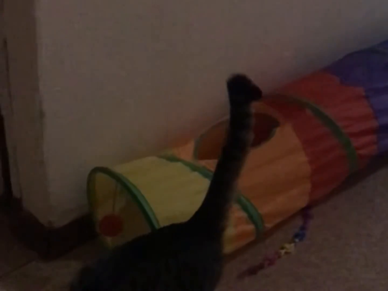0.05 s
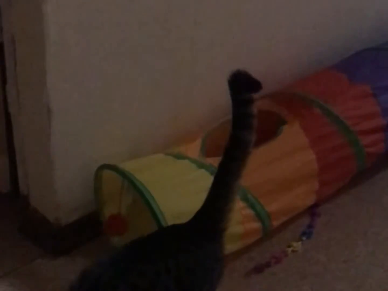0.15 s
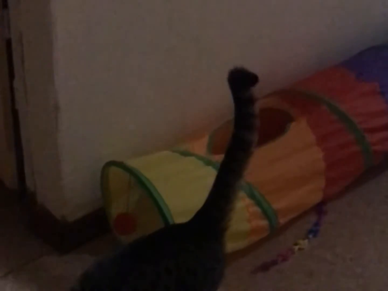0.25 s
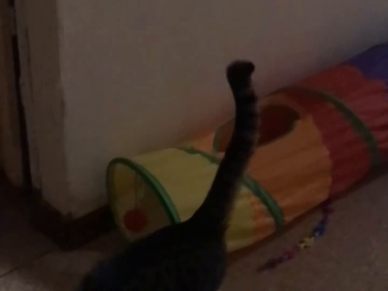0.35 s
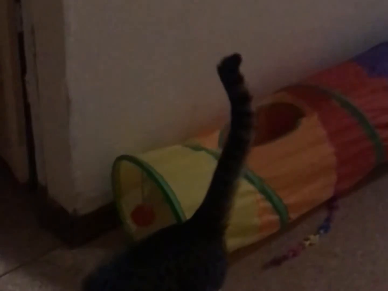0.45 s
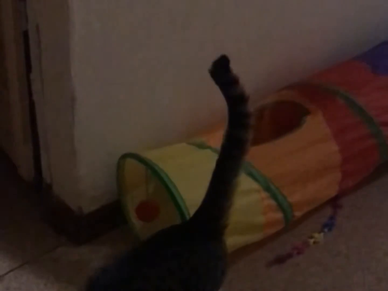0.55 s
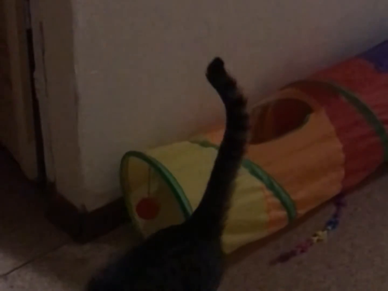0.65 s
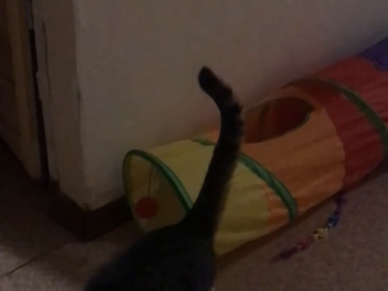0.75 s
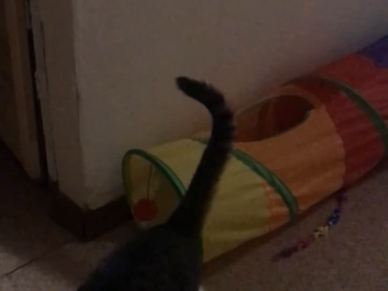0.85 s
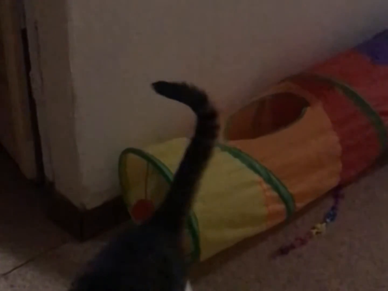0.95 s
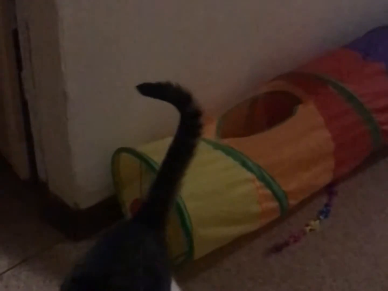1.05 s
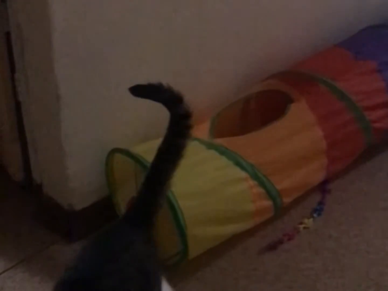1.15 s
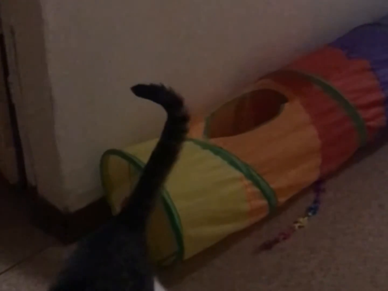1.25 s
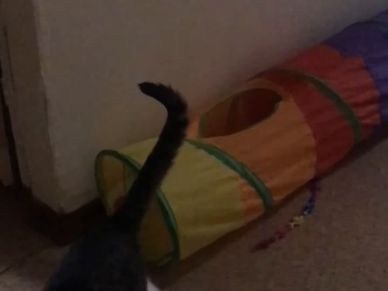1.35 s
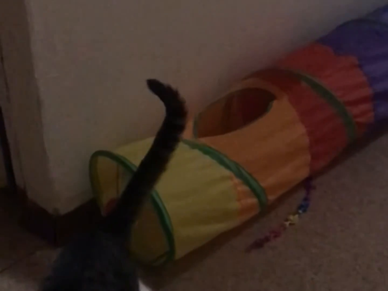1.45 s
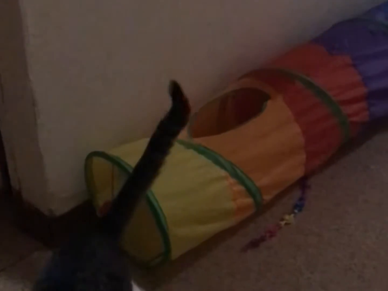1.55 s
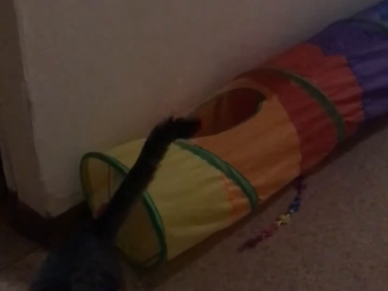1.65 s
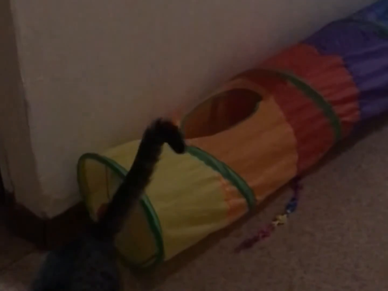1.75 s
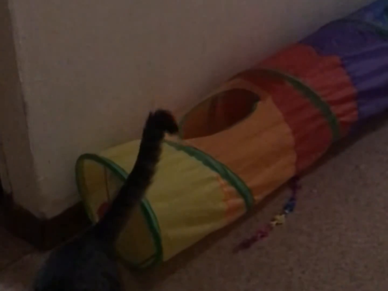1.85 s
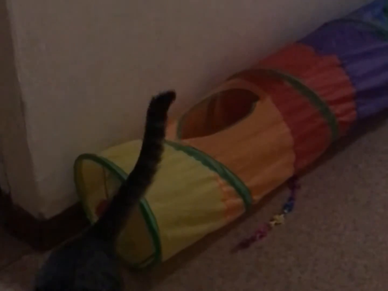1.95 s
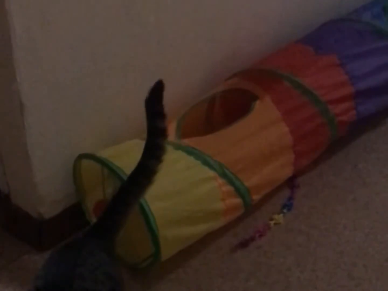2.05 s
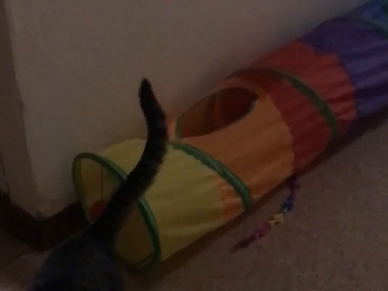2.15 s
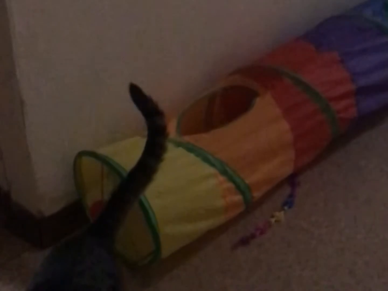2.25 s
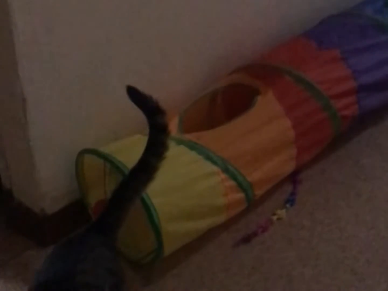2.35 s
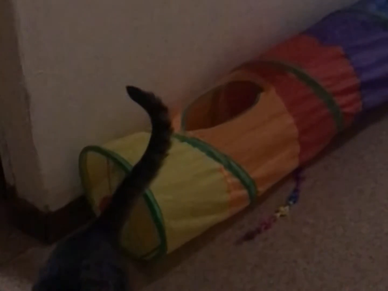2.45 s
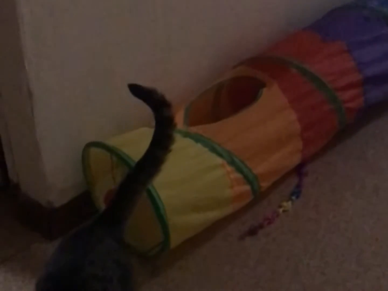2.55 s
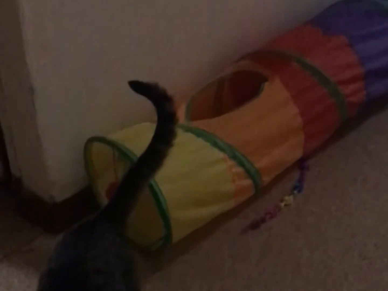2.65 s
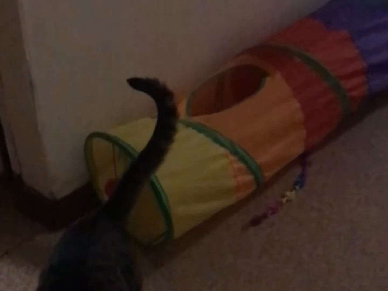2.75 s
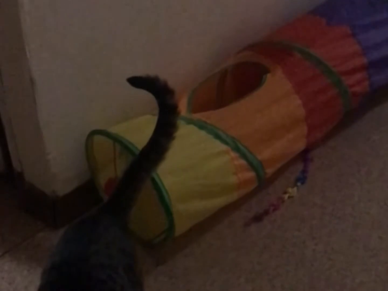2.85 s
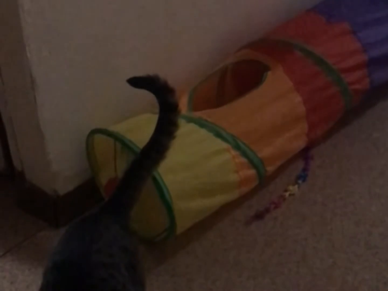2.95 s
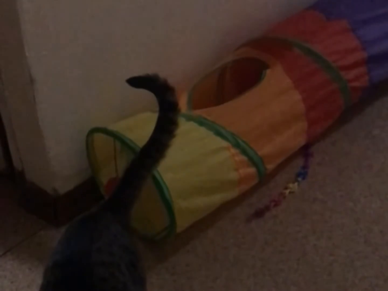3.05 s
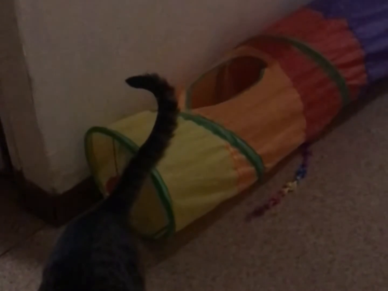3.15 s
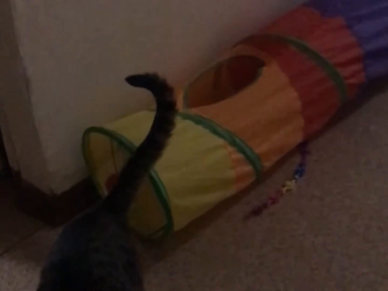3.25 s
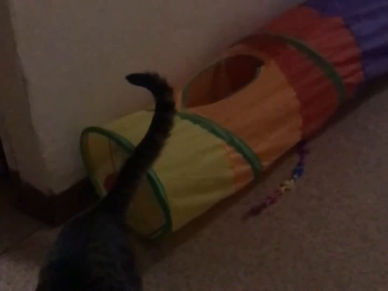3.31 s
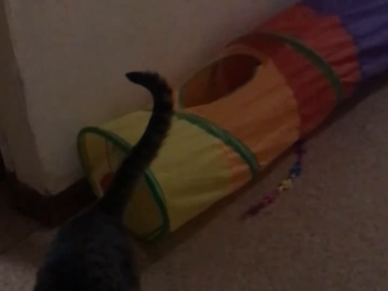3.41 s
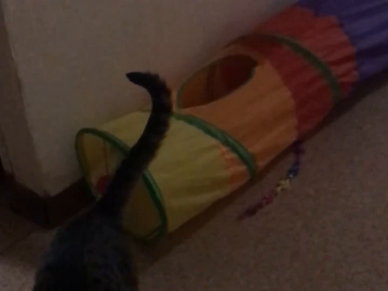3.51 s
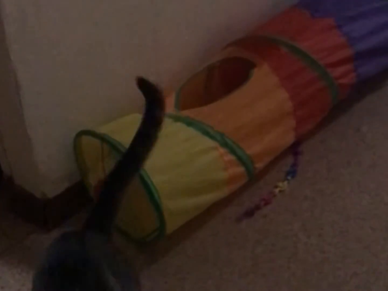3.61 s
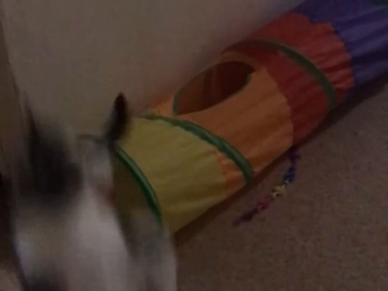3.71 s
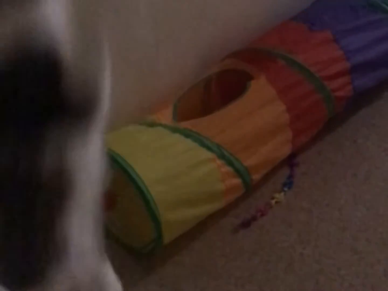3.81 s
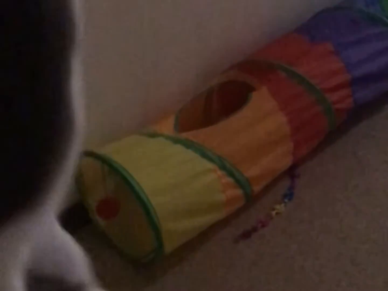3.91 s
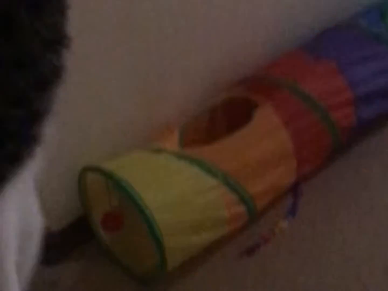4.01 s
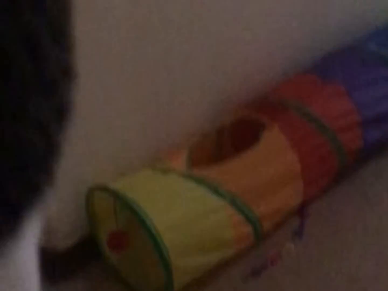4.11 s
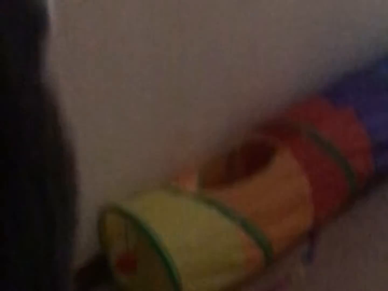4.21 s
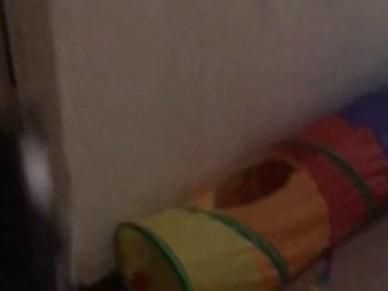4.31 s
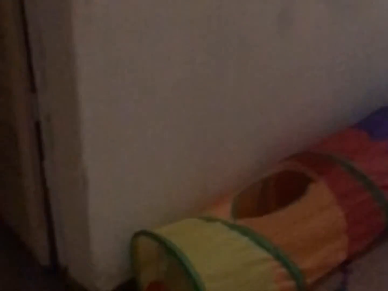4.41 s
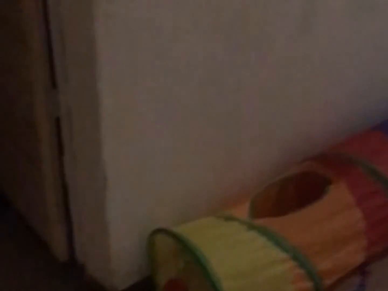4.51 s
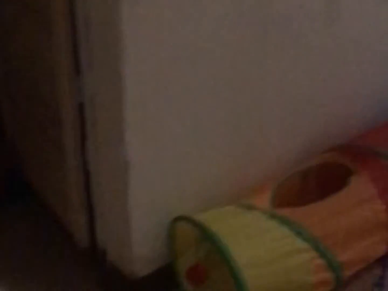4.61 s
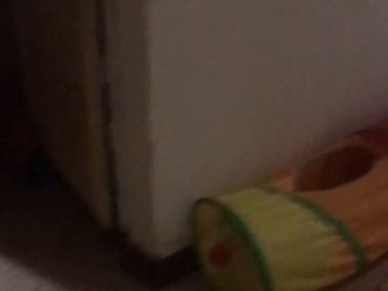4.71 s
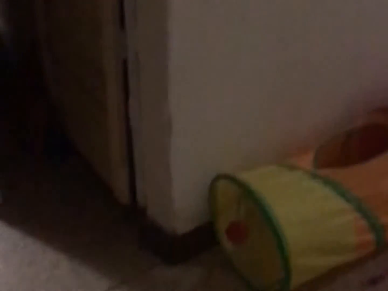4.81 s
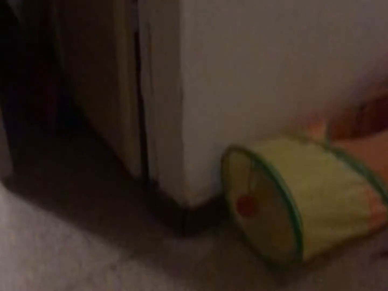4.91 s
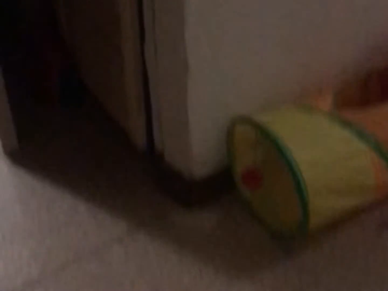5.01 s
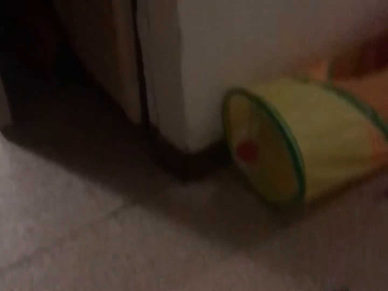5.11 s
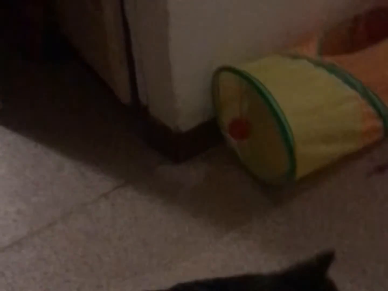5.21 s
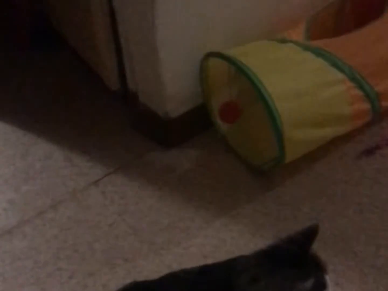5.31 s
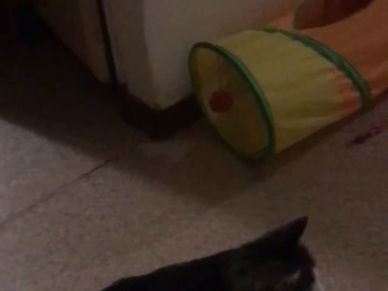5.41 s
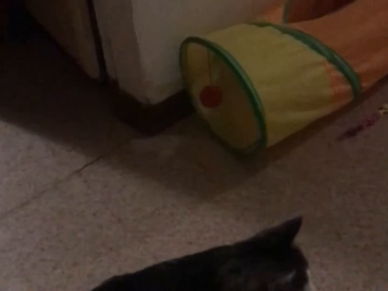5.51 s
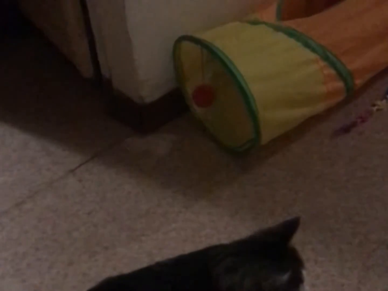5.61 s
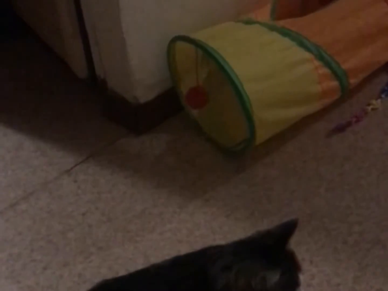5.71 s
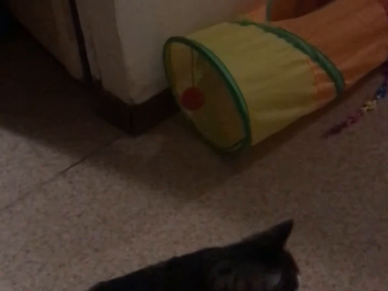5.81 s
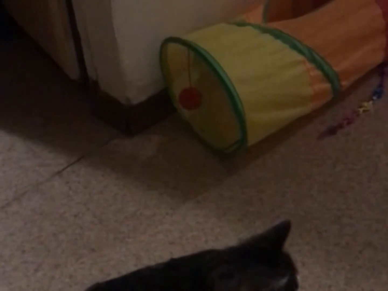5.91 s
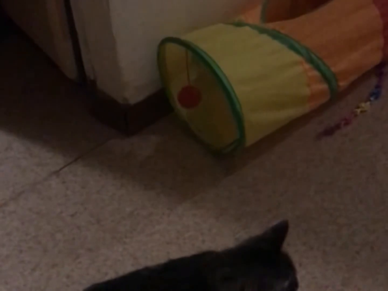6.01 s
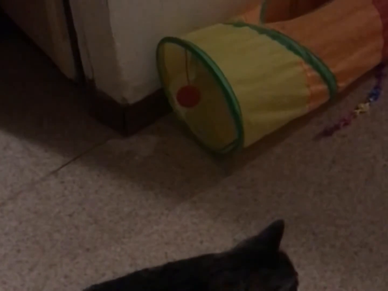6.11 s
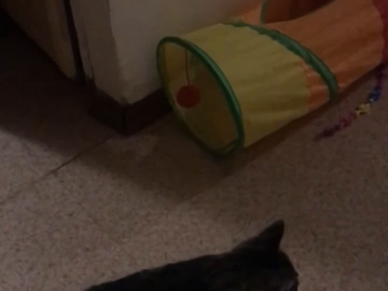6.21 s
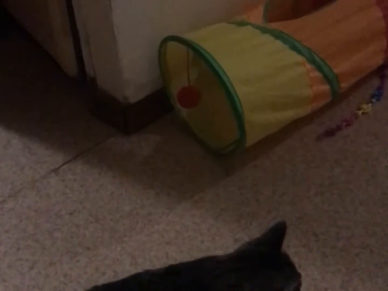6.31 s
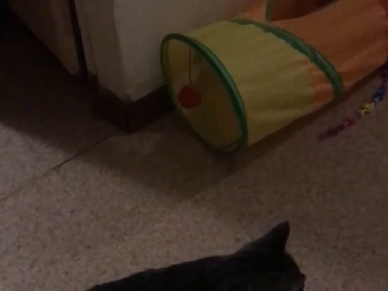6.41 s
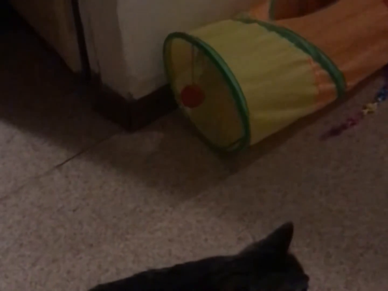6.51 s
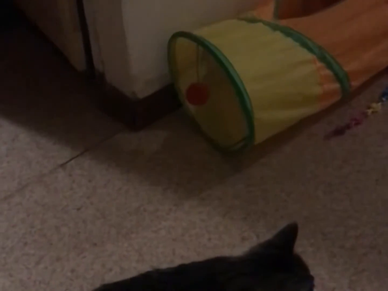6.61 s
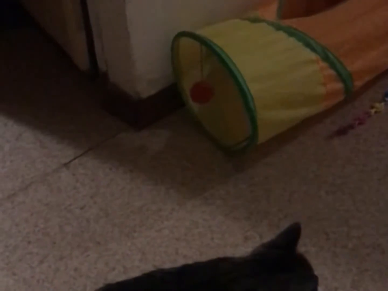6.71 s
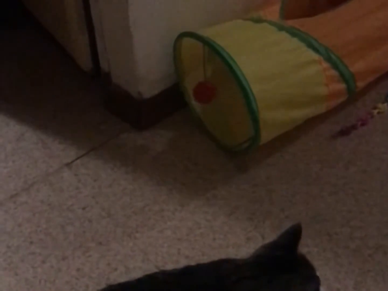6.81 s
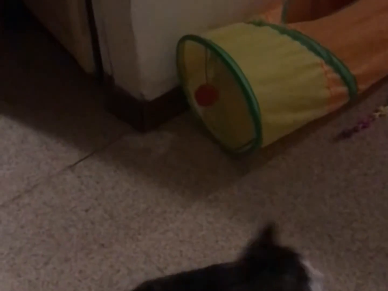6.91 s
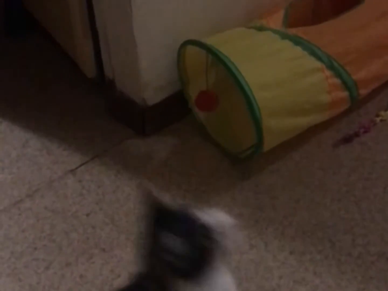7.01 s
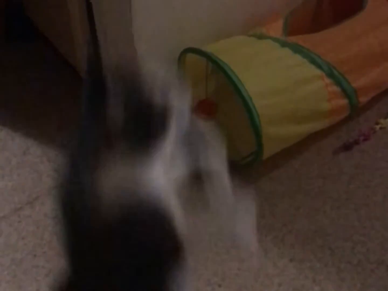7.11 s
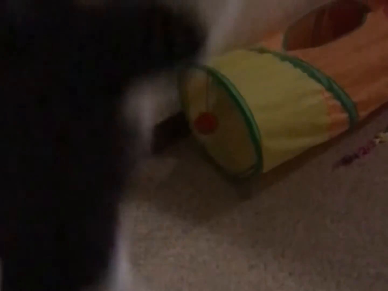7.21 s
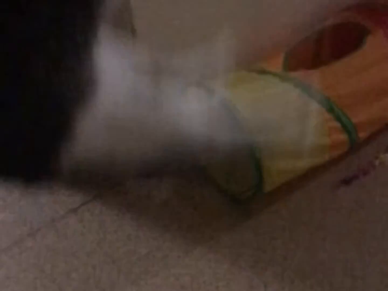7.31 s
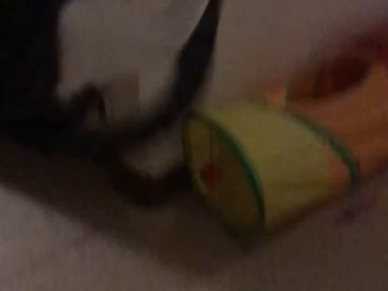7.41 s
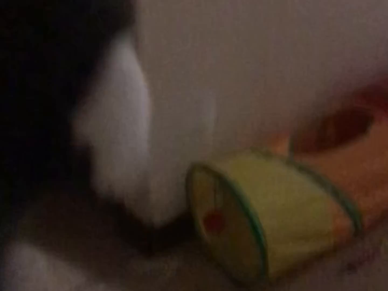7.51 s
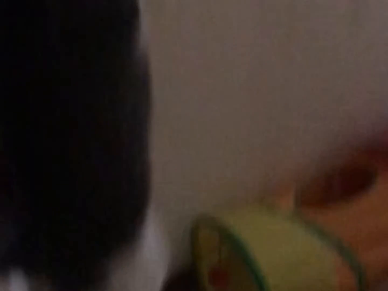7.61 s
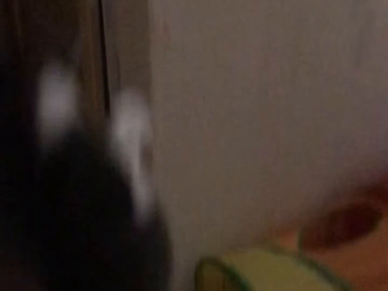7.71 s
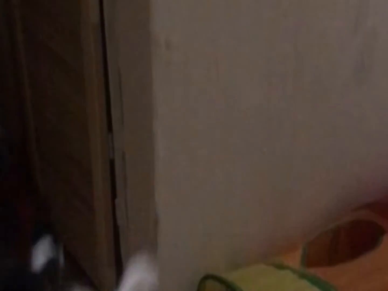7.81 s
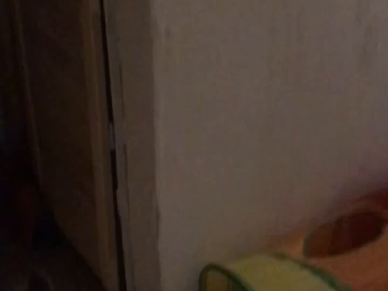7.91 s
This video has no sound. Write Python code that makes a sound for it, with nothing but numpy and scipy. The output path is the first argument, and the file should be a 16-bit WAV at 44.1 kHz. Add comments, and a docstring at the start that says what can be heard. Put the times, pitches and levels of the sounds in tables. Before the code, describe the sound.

Two cats move beside a nylon tunnel in an echoing hallway, heard close by. Small dry claw clicks and faint cloth rubbing come first, with dull distant steps at an even pace. A quick scuffle of paws ends in a hard, low thump with a short slap. Quiet rustling, a barely audible grunt and little squeaks follow, then soft low thuds, scratches and another sharp thump.

```python
"""Cats playing in a hallway

Two cats by a fabric tunnel, close up in a quiet hallway; one leaps up the wall twice and drops back.
Landings and steps ring the floor's modes, with filtered noise for the slap of the pads.
Claw ticks, skids, rustling nylon and squeaks are short shaped noises; a grunt is a nasal hum.
Bare walls echo it all except the floor's boom; behind lie far-off steps, a drone and faint air.
The microphone adds a shallow treble dip and a band limit."""
import sys
import numpy as np
from scipy import signal
from scipy.fft import rfft, irfft
from scipy.io import wavfile
from scipy.ndimage import uniform_filter1d

SR = 44100
rng = np.random.default_rng(int(sys.argv[2]) if len(sys.argv) > 2 else 0)


def transcribe(u):
    """Save the signal u as a 16-bit wav file named by the first command-line argument.

    u: samples, shape (n,) or (channels, n), limited to [-1, 1]; the rate is SR.
    q: integer samples, one column per channel.
    """
    v = np.clip(np.atleast_2d(u).T, -1, 1)
    q = np.round(v * 32767).astype(np.int16)
    wavfile.write(sys.argv[1], SR, q)


N = 350595  # samples

# Drops from the wall: [first touch t/s, weight level/dB, base softness corner f/Hz,
# slap level/dB, base slap corner f/Hz, stretch of the touchdown delays/x]
LANDINGS = [(4.492, -14.5, 253, -24.5, 2150, 1.02), (7.8359, -13.5, 330, -27.5, 1210, .96)]
# Toes, one forepaw, the other, hind paws: [delay before stretch t/s, weight re landing/dB,
# firmness/x softness corner, slap re landing/dB, slap fade t/s, brightness/x slap corner]
TOUCHDOWN = [(.0003, -29.5, 6, -2, 0.0053, 1.9), (.0074, 0, 0.98, 0, 0.0057, 0.63),
             (0.014, -22, 8, -0.5, 0.0048, 0.35), (.023, -11, 0.77, -5.5, .012, 0.72)]
# Single steps and push-offs: [t/s, level/dB, softness corner f/Hz, pat level/dB]
STEPS = [(.031, -56, 280, -64.5), (0.829, -51, 102, -75), (1.706, -52, 387, -69),
         (3.584, -47.5, 463, -55.5), (3.606, -47, 138, -68), (3.681, -38, 123, -62.5),
         (3.738, -37, 85, -60), (3.838, -33.5, 172, -56), (3.906, -41.5, 184, -61.5),
         (4.534, -26.5, 114, -48), (4.803, -28.5, 80, -64), (4.93, -48, 158, -62.5),
         (6.571, -60, 360, -64.5), (6.999, -31.5, 69.5, -74), (7.028, -44, 207, -63),
         (7.05, -27, 106, -69.5), (7.219, -28, 92.6, -56.5), (7.909, -20, 164, -49)]
PAT_FADE_S, PAT_DULL_HZ = 0.025, 530
# Resonances of floor and hallway: [f/Hz, level/dB, t60/s, build-up t/s]
FLOOR_MODES = [(34.1, -15.5, 0.21, 0.0082), (49.63, -20.5, 0.89, 0.016), (68.4, -42, .28, 0.0079),
               (84.3, -6, 0.32, 0.009), (120.1, -19.5, 0.45, 0.0093), (127.7, -0.5, 0.25, 0.011),
               (136.5, 11.5, 0.082, 0.029), (161.4, -6, 0.1, 0.0032), (235.3, -6.5, 0.23, 0.0045),
               (288, -4, 0.14, 0.0045), (319.4, -11.5, 0.069, 0.0045), (347, -10.5, 0.24, 0.0063),
               (403, -5, 0.086, .005), (469, -31, 0.063, 0.0022), (543, -3, 0.15, 0.003),
               (639, -17, 0.057, 0.0027), (867, 2, 0.044, .003), (872, -3, 0.15, 0.0016),
               (930, -20.5, 0.28, .003), (1074, -13, 0.49, 0.0025), (1113, -21, 0.216, 0.0015),
               (1455, -13, .2, 0.0018), (1670, -25, .25, .002), (2570, -44, .22, .001)]
# Tone of a pad's slap: [f/Hz, relative level/dB]
SLAP_COLOUR = [(60, -49.5), (150, 5), (280, 5.5), (430, 1), (700, -1.5), (1100, -4.5), (1400, -7),
               (1650, -6.5), (1900, -11), (2550, -5.5), (3300, -9), (4500, -23.5), (8000, -24),
               (16000, -12)]
# Paws skidding on the floor: [t/s, level/dB]
SKIDS = [(3.784, -60.5), (3.832, -56), (3.985, -54), (5.429, -60), (5.896, -52), (6.963, -64),
         (7.176, -58.5), (7.218, -53.5)]
SKID_FADE_S, SKID_DULL_HZ = 0.0083, 3400
# Claws on floor and wall, snaps of nylon: [t/s, level/dB, centre of bright region f/Hz, width/octaves]
TICKS = [(.236, -49, 8000, 1.3), (.397, -48, 6200, 1.05), (0.58, -51.5, 7860, 0.95),
         (1.216, -57.5, 6030, 1.3), (1.242, -54, 11100, .7), (1.296, -50.5, 8250, .85),
         (1.518, -56, 11600, 1.5), (1.657, -48, 6960, 0.37), (2.049, -58.5, 6500, 1.5),
         (2.329, -57.5, 6000, 0.23), (2.374, -50, 6200, 0.79), (2.454, -48.5, 7900, 0.95),
         (3.323, -59, 7300, .7), (3.408, -49, 10700, 1.5), (3.496, -43.5, 7000, 2.6),
         (3.966, -39, 7500, 1.6), (3.985, -37.5, 8550, 1.7), (4.4943, -46, 2600, .7),
         (4.4952, -31, 4830, 0.35), (4.512, -46, 5000, 0.49), (4.542, -35, 11000, 1.3),
         (4.846, -46, 6400, 1.7), (5.432, -53.5, 6170, 0.94), (5.475, -52, 5560, .22),
         (6.325, -53, 5200, 1.1), (6.424, -55.5, 3520, 0.62), (7.216, -56, 5700, 0.55),
         (7.427, -47, 7040, 1.4), (7.4455, -38, 8000, 2.2), (7.8364, -32.5, 3910, 0.62)]
# A tick dies at once, then the claw or crease drags on faintly
TICK_FADE_S, DRAG_DB, DRAG_FADE_S = 0.0018, -20.5, 0.0053
# Every tick also stirs one faint lower resonance
TICK_RING_HZ, TICK_RING_OCTAVES, TICK_RING_DB = 1970, 0.12, -12
# Nylon and fur rubbing: [middle t/s, level/dB, half length t/s]
RUBS = [(.14, -70.5, 0.25), (0.458, -73, .1), (1.29, -74, 0.036), (1.826, -75, .09), (2.38, -72.5, 0.075),
        (2.818, -75, 0.11), (3.553, -65.5, 0.033), (5.003, -72, .12), (5.526, -67, 0.071),
        (6.398, -69.5, 0.053), (6.516, -67.5, 0.024)]
# Tone of the rubbing: [f/Hz, relative level/dB]
RUB_COLOUR = [(200, -14.5), (900, -8.5), (2000, -8), (3300, -7.5), (5800, -4), (8000, -8.5), (10500, -5),
              (13000, -7), (16000, -15.5)]
# Small taut things squeaking: [t/s, level/dB, pitch f/Hz, fade t/s]
SQUEAKS = [(5.704, -60, 2080, 0.0042), (5.785, -59.5, 2660, 0.024), (5.896, -50.5, 2310, 0.032)]
# Low hum, core, rough skirt and overtones of every squeak: [multiple of pitch/x, level/dB, width/pitch]
SQUEAK_BANDS = [(.49, -12, 0.13), (1, -2, 0.077), (1.02, -8.5, 0.26), (2.25, -9.5, .35), (3.9, -7, 1.1)]
# The cat's closed-mouth grunt: [t/s, level/dB, pitch f/Hz]
GRUNT = [(5.538, -69, 274.5), (5.552, -55, 305.5), (5.564, -57.5, 311), (5.598, -61, 310),
         (5.612, -87, 297)]
# Tone of the nose: [f/Hz, relative level/dB]
NOSE = [(150, -15), (310, 0), (600, -6), (1200, -16), (1900, -7), (2400, -12), (2900, -18), (4500, -22),
        (12000, -44)]
# Dying away of the hallway's echo: [f/Hz, t60/s]
HALL = [(150, 0.5), (500, 0.42), (1300, 0.5), (3500, 0.41), (7000, 0.3), (14000, 0.3)]
# Someone walking far off in the building at an even pace: [t/s, level/dB]
FAR_STEPS = [(1.967, -45.5), (2.687, -40), (3.362, -40.5), (4.015, -45.5), (4.665, -39.5), (5.354, -49),
             (6.058, -46), (6.752, -46.5), (7.421, -54.5)]
# Floor level re a far step's boom; softness corner at the reference level, and its rise with level
FAR_FLOOR_DB, FAR_SOFT_HZ, FAR_REF_DB, FAR_OCTAVES_PER_DB = 3, 50.5, -46, 0.0561
# Spectrum of the air in the hallway: [f/Hz, relative level per Hz/dB]
AIR = [(12, -52), (20, -10), (32, -4.5), (74, -9), (150, -17), (204, -17.5), (248, -21), (337, -21.5),
       (660, -27.5), (976, -28), (2260, -36), (2910, -34), (10500, -40.5), (12800, -37), (16000, -39)]
AIR_DB = -67
# A distant drone that comes and goes: [t/s, level/dB]
DRONE = [(0, -63.5), (.5, -77), (.75, -61), (1.049, -76.5), (2.6, -69), (2.95, -65), (3.3, -59),
         (3.6, -74.5), (7.95, -67)]
CUT_HZ = 16050  # band limit at the microphone


def landings():
    """Toes, forepaws and hind paws strike in quick succession; returns floor boom and pad slaps."""
    boom, pads = np.zeros((2, N))
    for s, weight_db, soft_hz, slap_db, dull_hz, stretch in LANDINGS:
        for delay, share_db, firmness, pad_db, fade, bright in TOUCHDOWN:
            touch_s = s + stretch * delay
            add(boom, touch_s, amp(weight_db + share_db) * thud(soft_hz * firmness))
            add(pads, touch_s, amp(slap_db + pad_db) * slap(fade, dull_hz * bright))
    return np.array([boom, pads])


def steps():
    """Each step rings the floor while its pad gives a dull pat; returns boom and pats."""
    boom, pats = np.zeros((2, N))
    for s, db, soft_hz, pat_db in STEPS:
        add(boom, s, amp(db) * thud(soft_hz))
        add(pats, s, amp(pat_db) * slap(PAT_FADE_S, PAT_DULL_HZ))
    return np.array([boom, pats])


def thud(soft_hz, steepness=4.16):
    """A blow rings the floor's modes; a soft one reaches only the lowest."""
    t = np.arange(SR) / SR
    hz, db, t60, rise = np.transpose(FLOOR_MODES)[:, :, None]
    envelope = amp(db - 60 * t / t60) * (1 - np.exp(-t / rise))
    rings = envelope * np.sin(2 * np.pi * hz * t)
    force = 1 / np.sqrt(1 + (hz / soft_hz) ** (2 * steepness))
    return (rings * force).sum(axis=0)


def slap(fade, dull_hz, steepness=1.48):
    """A pad meets the floor: a burst of noise, dull above its corner frequency."""
    def tone(f):
        return read(SLAP_COLOUR, f) - 10 * np.log10(1 + (f / dull_hz) ** (2 * steepness))
    return colour(burst(fade), tone)


def skids():
    """A paw slips with no weight on it: a short bright scuff and no floor boom."""
    out = np.zeros(N)
    for s, db in SKIDS:
        add(out, s, amp(db) * slap(SKID_FADE_S, SKID_DULL_HZ))
    return out


def ticks(skirt_db=-32, low_hz=900):
    """Very short hard contacts, each with one bright region; too small to radiate bass."""
    out = np.zeros(N)
    for s, db, hz, octaves in TICKS:
        def tone(f):
            bright = hump(f, hz, octaves) / np.sqrt(1 + f / hz) + amp(skirt_db)
            ring = 1 + amp(TICK_RING_DB) * hump(f, TICK_RING_HZ, TICK_RING_OCTAVES)
            bass_loss = (f + 1) / np.hypot(f, low_hz)
            return 20 * np.log10(bright * ring * bass_loss)
        contact = burst(TICK_FADE_S) + amp(DRAG_DB) * burst(DRAG_FADE_S)
        add(out, s, amp(db) * colour(contact, tone))
    return out


def rubs(snaps_per_s=600, snap_db=1.5, hiss=1.6, flutter_db=1.9):
    """Tiny snaps of cloth over a soft hiss, in uneven clumps that swell with each movement."""
    t = np.arange(N) / SR
    power = sum(amp(db) ** 2 * np.exp(-((t - s) / half) ** 2) for s, db, half in RUBS)
    motion = np.sqrt(power)
    clumps = amp(flutter_db * unit(uniform_filter1d(rng.standard_normal(N), size=600)))
    crease_hz = np.linspace(2500, 15000, num=10)
    snaps = np.zeros(N)
    for hz in crease_hz:  # each crease snaps with its own brief pitch
        struck = rng.random(N) < snaps_per_s / len(crease_hz) / SR
        sizes = amp(snap_db * np.minimum(rng.exponential(1, N), 3)) * struck
        snap = np.exp(-t[:300] / 0.0002) * np.sin(2 * np.pi * hz * t[:300])
        snaps += signal.oaconvolve(sizes, snap)[:N]
    cloth = clumps * (unit(snaps) + hiss * rng.standard_normal(N))
    return motion * unit(colour(cloth, lambda f: read(RUB_COLOUR, f)))


def settling(per_s=14, db=-70, low_hz=6000):
    """The tunnel's nylon gives faint bright snaps at random moments throughout."""
    sizes = rng.uniform(.3, 3.2, N) * (rng.random(N) < per_s / SR)
    snap = colour(burst(0.0022), lambda f: -10 * np.log10(1 + (low_hz / (f + 1)) ** 4))
    return amp(db) * signal.oaconvolve(sizes, snap)[:N]


def squeaks():
    """A brief rub drives one narrow resonance, with a hum below it and overtones above."""
    out = np.zeros(N)
    for s, db, hz, fade in SQUEAKS:
        for multiple, band_db, width in SQUEAK_BANDS:
            def peak(f):
                return -10 * np.log10(1 + ((f / hz - multiple) / width) ** 4)
            add(out, s, amp(db + band_db) * colour(burst(fade), peak))
    return out


def grunt(rough=0.87, slope_db=-5):
    """A weak hum with a puff of noise each cycle, heard through the nose."""
    s, db, hz = np.transpose(GRUNT)
    t = np.arange(s[0], s[-1], 1 / SR)
    turns = np.cumsum(np.interp(t, s, hz)) / SR
    k = np.arange(1, 11)  # harmonics
    harmonic_amp = amp(read(NOSE, k * hz.mean()) + slope_db * np.log2(k))  # slope in dB per octave
    hum = harmonic_amp @ np.sin(2 * np.pi * np.outer(k, turns))
    puffs = colour(rng.standard_normal(len(t)) * (1 - turns % 1), lambda f: read(NOSE, f))
    voice = unit(unit(hum) + rough * unit(puffs))
    out = np.zeros(N)
    add(out, s[0], amp(np.interp(t, s, db)) * voice)
    return out


def hallway(x, count=5):
    """Diffuse echo of the bare hallway; random tails take turns so that no one tail colours every sound."""
    turn = np.arange(N) / SR * 90  # 90 slices per second, cycling through the tails
    out = np.zeros(N)
    for k in range(count):
        away = np.minimum(abs((turn - k) % count - count / 2), 1)
        out += signal.fftconvolve(x * np.cos(np.pi / 2 * away), echo_tail())[:N]
    return out


def echo_tail(build=0.00079, early=0.025):
    """Reflections from near bare walls: sparse, then dense, each band dying at its own speed."""
    age = np.arange(SR) / SR
    density = np.clip((age / early) ** 2 / 10, .01, 1)
    taps = rng.choice([-1, 1], SR) * (rng.random(SR) < density) / np.sqrt(density)
    swell = 1 - np.exp(-(age / build) ** 2)
    hz, t, bands = signal.stft(taps * swell, SR, nperseg=256)
    decay = amp(-60 * t / read(HALL, hz)[:, None])
    tail = signal.istft(bands * decay, SR, nperseg=256)[1]
    return tail / np.linalg.norm(tail)


def far_steps(boom_hz=49.05, t60=0.55, rise=0.011):
    """The building's lowest resonance carries this far; heavier steps reach higher floor modes."""
    t, out = np.arange(SR) / SR, np.zeros(N)
    envelope = amp(-60 * t / t60) * (1 - np.exp(-t / rise))
    boom = envelope * np.sin(2 * np.pi * boom_hz * t)
    for s, db in FAR_STEPS:
        soft_hz = FAR_SOFT_HZ * 2 ** (FAR_OCTAVES_PER_DB * (db - FAR_REF_DB))
        add(out, s, amp(db) * (boom + amp(FAR_FLOOR_DB) * thud(soft_hz)))
    return out


def air(drone_hz=71, drone_width_hz=3):
    """Faint steady rumble and hiss from shaped noise, with a narrow wavering drone."""
    f = np.fft.rfftfreq(N, 1 / SR)
    hiss = irfft(rfft(rng.standard_normal(N)) * amp(read(AIR, f)), N)
    drone_band = np.exp(-((f - drone_hz) / drone_width_hz) ** 2)
    drone = irfft(rfft(rng.standard_normal(N)) * drone_band, N)
    drone_db = np.interp(np.arange(N) / SR, *np.transpose(DRONE))
    return amp(AIR_DB) * unit(hiss) + amp(drone_db) * unit(drone)


def burst(fade, grit_db=4, onset_share=0.1, evenness=0.56, size=12000):
    """A sudden gritty contact that dies away; its chance colour is partly evened out."""
    t = np.arange(size) / SR
    shape = np.exp(-t / fade) * (1 - np.exp(-t / (fade * onset_share)))
    roughness = unit(uniform_filter1d(rng.standard_normal(size), size=20))
    grit = amp(grit_db * np.clip(roughness, -2, 2))
    noise = rng.standard_normal(size) * grit * shape
    power_db = 10 * np.log10(uniform_filter1d(abs(rfft(noise)) ** 2, size=100) + 1e-12)
    noise_hz = np.fft.rfftfreq(size, 1 / SR)
    even = colour(noise, lambda f: -evenness * np.interp(f, noise_hz, power_db))
    return unit(even) * np.sqrt(np.mean(shape ** 2))


def colour(x, curve, size=4096):
    """Causal minimum-phase filter of unit energy from a function f/Hz -> level/dB."""
    db = np.maximum(curve(abs(np.fft.fftfreq(size, 1 / SR))), -100)
    spectrum = np.exp(np.conj(signal.hilbert(np.log(amp(db)))))
    taps = np.fft.ifft(spectrum).real[:size // 2]
    return signal.oaconvolve(x, taps / np.linalg.norm(taps))[:len(x)]


def hump(f, hz, octaves):
    """A bell-shaped gain on a log-frequency axis."""
    return np.exp(-(np.log2((f + 1) / hz) / octaves) ** 2 / 2)


def read(points, hz):
    """Reads a table on a log-frequency axis."""
    f, value = np.transpose(points)
    return np.interp(np.log(hz + 1), np.log(f + 1), value)


def amp(db):
    """Amplitude from level/dB."""
    return 10 ** (np.asarray(db) / 20)


def unit(x):
    """Scales to rms 1."""
    return x / np.sqrt(np.mean(x ** 2) + 1e-20)


def add(mix, s, sound):
    """Mixes a sound in at t/s."""
    part = mix[max(round(s * SR), 0):][:len(sound)]
    part += sound[:len(part)]


def scene(slap_room_db=-2.5, tick_room_db=-1, small_room_db=-6):
    """The cats close up, their echo in the hallway, and the building behind."""
    boom, pads = landings() + steps()
    pads = pads + skids()
    claws = ticks()
    small = rubs() + settling() + squeaks() + grunt()
    echo = hallway(amp(slap_room_db) * pads + amp(tick_room_db) * claws + amp(small_room_db) * small)
    return (boom + pads + claws + small + echo + far_steps() + air())[None]


def record(dry, dip_hz=10500, dip_width_hz=800, dip_db=-3):
    """The microphone has a shallow dip in the treble; then the band limit."""
    f = np.fft.rfftfreq(2 * N, 1 / SR)
    dip = amp(dip_db * np.exp(-((f - dip_hz) / dip_width_hz) ** 2))
    heard = irfft(rfft(dry, 2 * N) * dip)[:, :N]
    band_limit = signal.firwin(511, CUT_HZ, window=("kaiser", 9), fs=SR)
    return signal.oaconvolve(heard, band_limit[None], "same")


dry = scene()
out = record(dry)
transcribe(out)
```